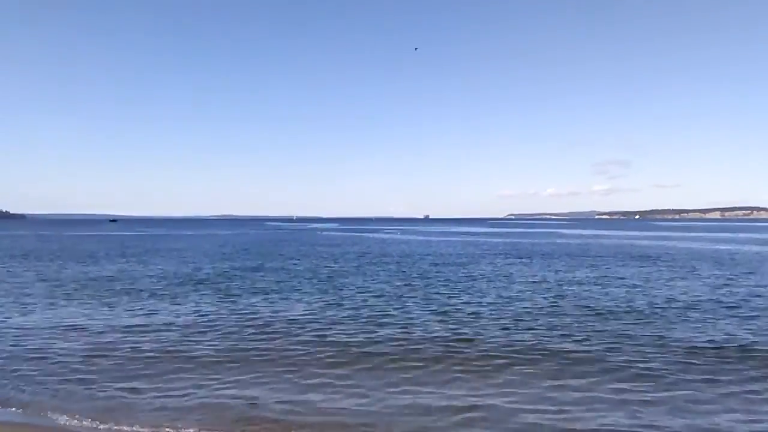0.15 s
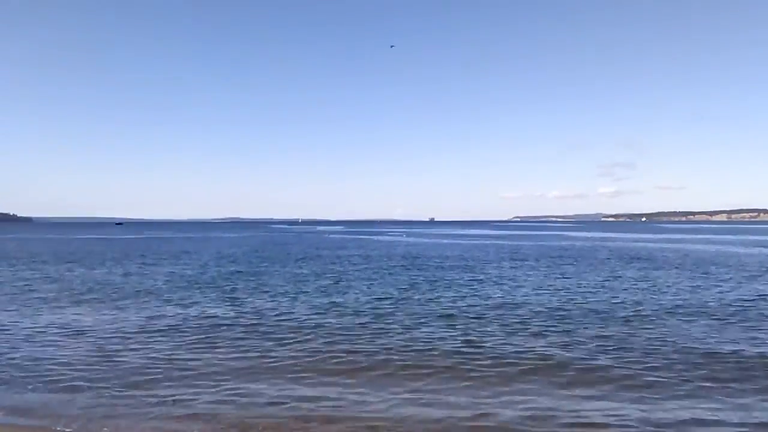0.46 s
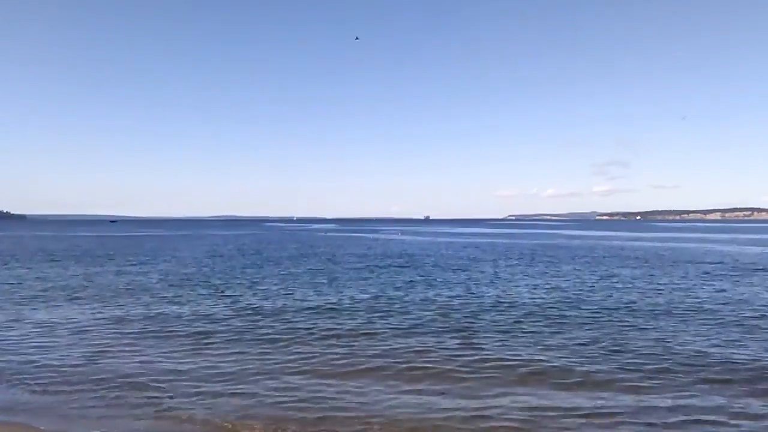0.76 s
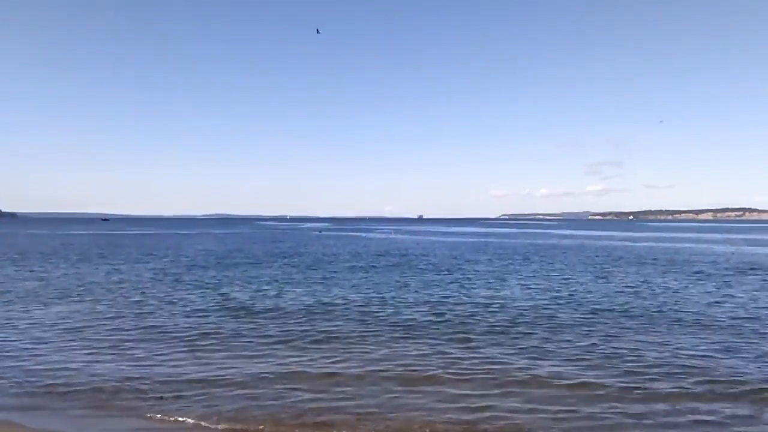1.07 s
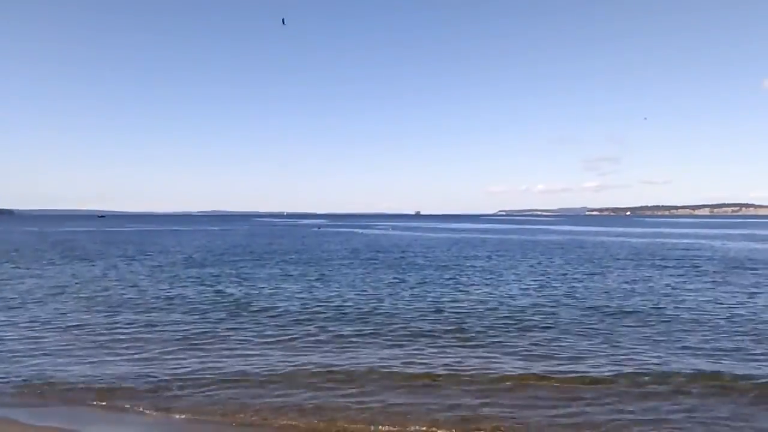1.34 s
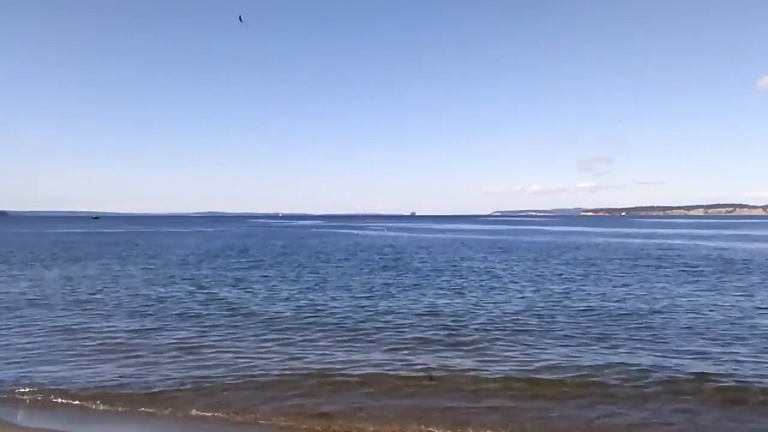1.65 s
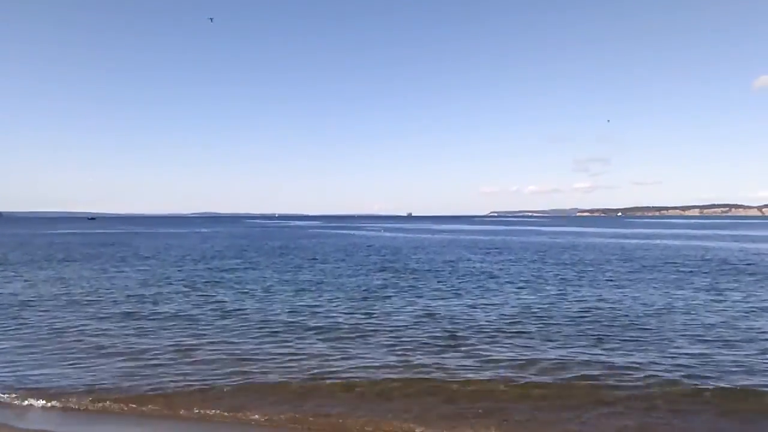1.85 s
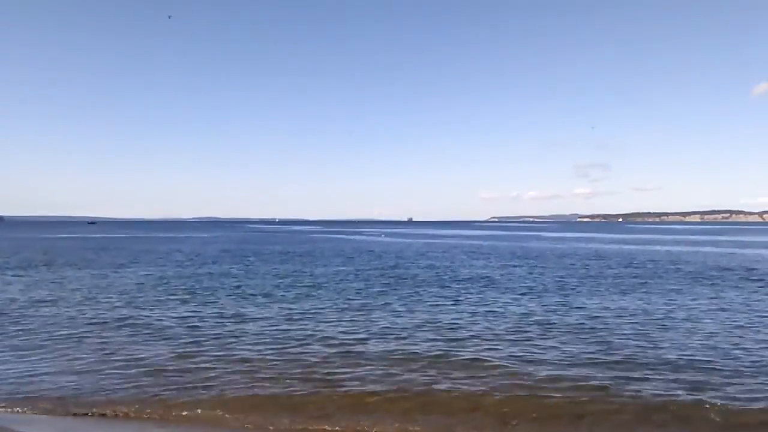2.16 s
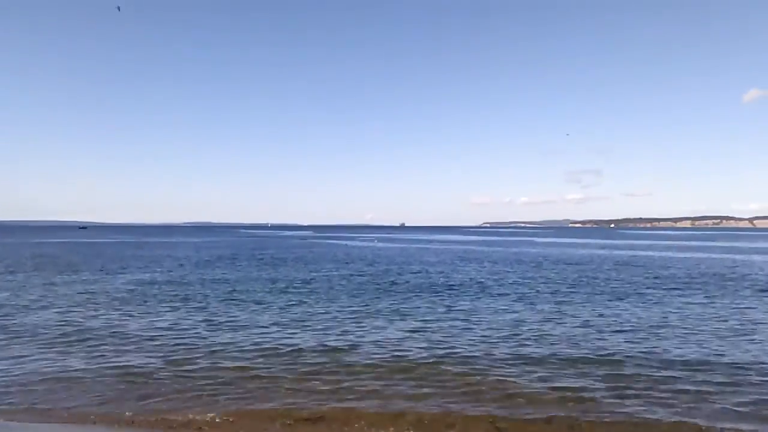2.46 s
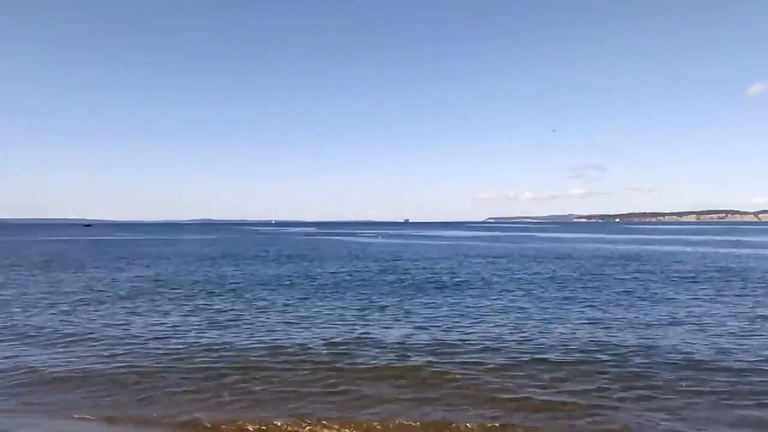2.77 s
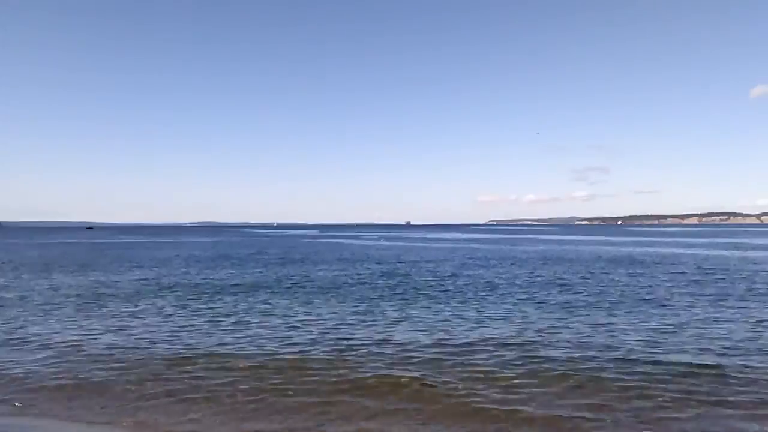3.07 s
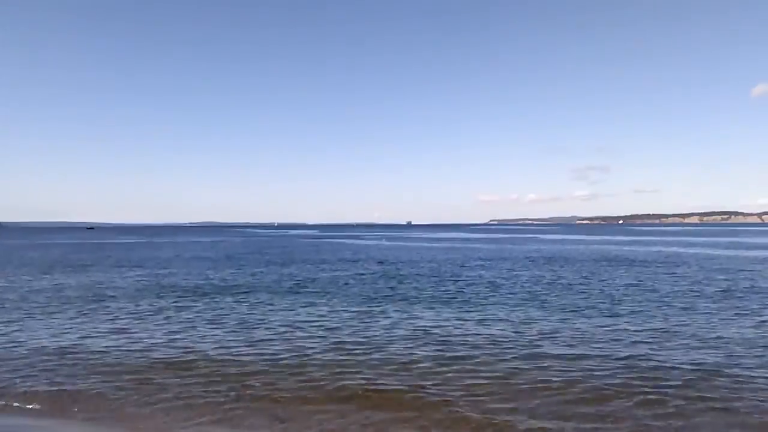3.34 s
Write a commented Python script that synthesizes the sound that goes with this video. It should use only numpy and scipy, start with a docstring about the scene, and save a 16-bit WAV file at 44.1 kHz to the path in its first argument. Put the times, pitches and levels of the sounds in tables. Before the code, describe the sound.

Small waves wash and fizz onto a sandy beach, bubbling, with light wind rumble.

```python
"""Small waves on a sandy beach

Heard from the water's edge in a light breeze: one wavelet washes in farther along the shore; a nearer one
runs up from the left, spits spray and folds over with bubbles. Washes are crackling noise shaped over time
and frequency, bubbles are decaying sines, spray and drops are short clicks and bursts. Washes and bubbles
reach the right microphone port inverted; wind rumbles in both ports and its puffs bump the left one."""
import sys
import numpy as np
from scipy import signal
from scipy.fft import rfft, irfft
from scipy.io import wavfile
from scipy.ndimage import uniform_filter1d

SR = 44100
rng = np.random.default_rng(int(sys.argv[2]) if len(sys.argv) > 2 else 0)


def transcribe(u):
    """Save the signal u as a 16-bit wav file named by the first command-line argument.

    u: samples, shape (n,) or (channels, n), limited to [-1, 1]; the rate is SR.
    q: integer samples, one column per channel.
    """
    v = np.clip(np.atleast_2d(u).T, -1, 1)
    q = np.round(v * 32767).astype(np.int16)
    wavfile.write(sys.argv[1], SR, q)


N = 154791
TIME = np.arange(N) / SR

# nearer wavelet, relative levels: [time_s, churn_db, fizz_db]
NEAR_WAVE = [(1.1, -8.5, -12), (1.3, -9.5, -11.5), (1.41, -3, -4), (1.62, -2, -6.5), (1.85, -7.5, -7.5),
             (2.0, -13, -10), (2.2, -35, -10.5), (2.52, -37, -9.5), (2.64, -7.5, -2), (2.74, -5, 0.5),
             (2.84, -1.5, 3.5), (2.93, 0, 2), (3.0, 2, 0), (3.16, 0, 2), (3.21, -5, -3), (3.31, -8.5, -9),
             (3.48, -10, -17)]
# farther wavelet, relative levels: [time_s, churn_db, fizz_db]
FAR_WAVE = [(0.08, -10, -7), (.16, -0.5, -3), (.3, -1, -3.5), (.5, -1, -0.5), (.7, 2.5, 2), (.9, 0.5, -1),
            (1.02, -2, -5.5), (1.25, -7, -12), (1.8, -19, -27), (2.3, -10.5, -33)]
# spectrum of near water before its level curves: [freq_hz, left_db_per_hz, right_db_per_hz]
NEAR_COLOUR = [(210, -79.5, -81.5), (484, -86, -89), (650, -80.5, -84), (940, -82.5, -83.5),
               (1220, -83.5, -83.5), (1470, -81.5, -82.5), (2400, -82, -87.5), (3700, -82, -84.5),
               (6400, -87, -86.5), (9300, -89, -87), (10700, -80, -89), (11300, -73.5, -90),
               (12800, -84.5, -102), (13320, -83, -95), (14500, -107.5, -103)]
# likeness of near water at the two ports: [freq_hz, likeness_0_to_1]
NEAR_LIKENESS = [(500, 0.95), (1100, 0.85), (2200, 0.12), (5000, 0.074)]
NEAR_LAG_S = 0.00016  # right port after left
BUBBLE_RIGHT_DB = -9  # right port relative to left


def amp(db):
    """Decibels to gain."""
    return 10 ** (np.asarray(db) / 20)


def unit(x):
    """Scales to rms 1."""
    return x / np.sqrt(np.mean(x ** 2) + 1e-20)


def over_hz(table, hz):
    """Reads each column of a table along log frequency."""
    table_hz, *columns = np.transpose(table)
    return np.array([np.interp(np.log(hz + 1), np.log(table_hz + 1), c) for c in columns])


def over_time(table, t):
    """Reads each column of a table along time, holding the end values outside it."""
    table_s, *columns = np.transpose(table)
    return np.array([np.interp(t, table_s, c) for c in columns])


def add(mix, start_s, sound):
    """Mixes a sound in at its start time, cut at the end of the mix."""
    part = mix[..., round(start_s * SR):][..., :sound.shape[-1]]
    part += sound[..., :part.shape[-1]]


def wander(rate_hz):
    """Random drift of rms 1: noise above 3 Hz that rolls off past rate_hz."""
    hz = np.fft.rfftfreq(N, 1 / SR)
    gain = (hz > 3) / (1 + (hz / rate_hz) ** 2)
    return unit(irfft(rfft(rng.standard_normal(N)) * gain, N))


def tint(x, colour):
    """Gives unit white noise a spectrum per port; minimum phase avoids ringing ahead of a click."""
    size = 2 ** 18
    hz = abs(np.fft.fftfreq(size, 1 / SR))
    log_gain = np.log(amp(over_hz(colour, hz)) * np.sqrt(SR / 2))
    response = np.exp(np.conj(signal.hilbert(log_gain)))
    return np.fft.ifft(np.fft.fft(x, size) * response).real[:, :N]


def crackle(per_s, spread_db, share):
    """Two trains of bursting bubbles, mostly tiny, over the noise blur of countless others."""
    size = amp(spread_db * np.minimum(rng.exponential(1, N), 4))
    size = size * (rng.random(N) < per_s / SR)
    share = np.clip(share, 0, 1)  # power share of the bursts
    bursts = unit(size * rng.standard_normal((2, N)))
    blur = rng.standard_normal((2, N))
    return np.sqrt(share) * bursts + np.sqrt(1 - share) * blur


def wash(grains, wave, colour, likeness, lag_s, churn_hz, fizz_hz, patchy_db):
    """Bubble noise swells with the wave, low churn and high fizz apart, and reaches both ports."""
    drain_db_per_s = 80
    hz, t, (a, b) = signal.stft(grains, SR, nperseg=512, noverlap=384)
    same = np.clip(over_hz(likeness, hz).T, 0, 1)
    delay = np.exp(-2j * np.pi * hz * lag_s)[:, None]
    right = -(same * a + np.sqrt(1 - same ** 2) * b) * delay  # inverted
    # fade before the wave arrives and after it drains
    outside_s = abs(t - np.clip(t, wave[0][0], wave[-1][0]))
    churn, fizz = over_time(wave, t) - drain_db_per_s * outside_s
    high = over_hz([(churn_hz, 0), (fizz_hz, 1)], hz).T
    patches = uniform_filter1d(rng.standard_normal((len(t), len(hz))), size=9, axis=0)
    patches = unit(uniform_filter1d(patches, size=7, axis=1)).T
    field = amp(churn + high * (fizz - churn) + patchy_db * patches)
    ports = signal.istft(np.array([a, right]) * field, nperseg=512, noverlap=384)[1]
    return tint(ports[:, :N], colour)


def near_wave():
    """A grainy wash close by, its level sloshing quickly at random."""
    slosh = amp(0.9 * wander(rate_hz=40))
    grains = crackle(per_s=2000, spread_db=2.0, share=0.27) * slosh
    return amp(-1.9) * wash(grains, NEAR_WAVE, NEAR_COLOUR, NEAR_LIKENESS, NEAR_LAG_S,
                            churn_hz=1540, fizz_hz=6340, patchy_db=2.3)


def lip():
    """Thin crackling lip running over the sand at the left, so compact that the ports hear it much alike."""
    # relative levels: [time_s, churn_db, fizz_db]
    lip_wave = [(1.3, -15, -15.5), (1.85, -11.5, -15), (2.1, -10.5, -18.5), (2.22, -12, -6),
                (2.33, -11.5, -10.5), (2.44, -8.5, -7), (2.54, -12.5, -9.5), (2.8, -4, -23)]
    # likeness of the ports: [freq_hz, likeness_0_to_1]
    lip_likeness = [(6000, 1), (9000, 0.79), (13000, 0.22)]
    grains = crackle(per_s=1200, spread_db=2, share=0.42)
    return wash(grains, lip_wave, NEAR_COLOUR, lip_likeness, lag_s=0.000336,
                churn_hz=1560, fizz_hz=6300, patchy_db=2.8)


def far_wave():
    """A smooth wash farther along the beach, reaching the right port first."""
    # spectrum before the level curves: [freq_hz, left_db_per_hz, right_db_per_hz]
    far_colour = [(197, -82, -84.5), (524, -83, -87), (880, -84.5, -92.5), (1360, -82.5, -86),
                  (2015, -84.5, -91.5), (2710, -100.5, -89.5), (3540, -88, -91), (5600, -97, -97),
                  (7000, -88.5, -100.8), (10000, -94.5, -88.5), (10000, -83, -98), (11240, -80, -102),
                  (12100, -94, -103.0), (13200, -100.0, -109.9)]
    # likeness of the ports: [freq_hz, likeness_0_to_1]
    far_likeness = [(500, 0.97), (2500, 1), (6000, 0.43)]
    grains = crackle(per_s=2000, spread_db=3.0, share=0.15)
    return wash(grains, FAR_WAVE, far_colour, far_likeness, lag_s=-0.0003,
                churn_hz=1790, fizz_hz=7200, patchy_db=1.5)


def bubble(pitch_hz, left_peak_db):
    """A bubble pinches off sharply and rings for a few cycles, rising slightly in pitch."""
    decay_cycles, rise = 2.6, 0.01  # rise: share of pitch per decay time
    lag_s = np.array([[0], [NEAR_LAG_S]])
    age_s = np.maximum(np.arange(round(0.04 * SR)) / SR - lag_s, 0)
    age = age_s * pitch_hz / decay_cycles  # in decay times
    tone = np.sin(2 * np.pi * decay_cycles * age * (1 + rise * age / 2))
    ring = tone * np.exp(-age) * (1 - np.exp(-20 * age))
    return amp(left_peak_db) * ring / ring.max() * np.array([[1], [-amp(BUBBLE_RIGHT_DB)]])


def gurgle(wave, per_s, base_db, low_hz, high_hz):
    """Many small bubbles of random pitch and loudness gurgle throughout, following the wave's churn
    and holding its end levels outside it."""
    spread_db = 12
    out = np.zeros((2, N))
    for when, pitch, loudness in rng.random((round(per_s * N / SR), 3)):
        start_s = when * N / SR
        pitch_hz = low_hz * (high_hz / low_hz) ** pitch
        churn_db = over_time(wave, start_s)[0]
        add(out, start_s, bubble(pitch_hz, base_db + spread_db * loudness ** 2 + churn_db))
    return out


def bubbles():
    """Both wavelets gurgle, the farther one more dully; single louder bubbles pop among them."""
    # louder bubbles: [start_s, pitch_hz, left_peak_db]
    loud_bubbles = [(0.294, 1400, -40), (0.652, 1550, -36), (1.2535, 2380, -37.5), (1.3965, 2470, -38.5),
                    (1.419, 2350, -39), (1.612, 1650, -38), (1.6995, 3100, -39), (2.748, 750, -33.5),
                    (2.762, 660, -37.5), (2.798, 975, -38), (2.828, 970, -34), (2.831, 1550, -32),
                    (2.853, 1830, -36), (2.879, 1000, -36), (2.9108, 4000, -31), (2.918, 1900, -31),
                    (2.979, 1650, -35), (3.1225, 1660, -31), (3.1248, 2160, -31), (3.162, 674, -41)]
    out = gurgle(NEAR_WAVE, per_s=170, base_db=-52, low_hz=850, high_hz=5000)
    out += gurgle(FAR_WAVE, per_s=130, base_db=-54.5, low_hz=800, high_hz=2100)
    for start_s, pitch_hz, left_peak_db in loud_bubbles:
        add(out, start_s, bubble(pitch_hz, left_peak_db))
    return out


def clouds():
    """A cloud of trapped air hums noisily around one pitch, swelling and dying away."""
    # bubbles ringing together, level before the swell: [start_s, length_s, pitch_hz, left_rms_db]
    cloud_table = [(0.153, 0.076, 1130, -53.5), (2.191, 0.057, 756, -51), (2.853, 0.097, 3440, -49),
                   (2.897, .15, 171, -54), (2.978, 0.18, 1900, -52.5), (3.003, 0.23, 490, -60.5),
                   (3.117, 0.042, 3030, -47.5)]
    width = 0.45  # share of pitch, each side, at -12 dB
    out = np.zeros((2, N))
    hz = np.fft.rfftfreq(N, 1 / SR)
    delay = np.exp(-2j * np.pi * hz * NEAR_LAG_S)
    for start_s, length_s, pitch_hz, left_rms_db in cloud_table:
        resonance = 1 / (1 + ((hz - pitch_hz) / (width * pitch_hz)) ** 2) ** 2
        ring = rfft(rng.standard_normal(N)) * resonance
        left = unit(irfft(ring, N))
        right = unit(irfft(-ring * delay, N))
        phase = np.clip((TIME - start_s) / length_s, 0, 1)
        swell = np.sqrt(np.maximum(np.sin(np.pi * phase), 0))
        out += amp(left_rms_db) * swell * np.array([left, amp(BUBBLE_RIGHT_DB) * right])
    return out


def spray():
    """Short spits of spray: crackle in bursts that peak after a third of their length, then decay."""
    # spits, relative level: [start_s, level_db, length_s]
    spit_table = [(2.192, -6, 0.015), (2.308, -7.5, 0.016), (2.322, -7.5, 0.012), (2.416, -6.5, 0.016),
                  (2.825, -7, .016), (3.126, -3, 0.026), (3.165, -12, 0.0077)]
    spits = np.zeros(N)
    for start_s, level_db, length_s in spit_table:
        age = np.maximum(TIME - start_s, 0) / (length_s / 3)
        spits += amp(level_db + 4) * age * np.exp(1 - age)  # all spits 4 dB up
    grains = crackle(per_s=2100, spread_db=3.5, share=0.45)
    low_cut = signal.butter(1, 2200, "high", fs=SR, output="sos")
    return signal.sosfilt(low_cut, tint(spits * grains, NEAR_COLOUR))


def drops():
    """Single drops tick close to the microphone: coloured impulses, quieter at the right port."""
    # close drops: [start_s, left_peak_db]
    drop_table = [(1.5648, -31), (1.602, -34), (2.1993, -22.5), (2.3242, -26), (2.3792, -24.5),
                  (3.1615, -23)]
    # tick spectrum before peak scaling: [freq_hz, left_db_per_hz, right_db_per_hz]
    tick_colour = [(1500, -14, -16), (4500, -2, -4), (9000, 4, 0), (11200, 19, 4), (14000, 7, 4)]
    right_db = -9
    tick = tint(signal.unit_impulse(N), tick_colour)[:, :256]
    tick = tick / abs(tick).max(axis=1, keepdims=True) * amp([[0], [right_db]])
    out = np.zeros((2, N))
    for start_s, left_peak_db in drop_table:
        add(out, start_s, amp(left_peak_db) * tick)
    return out


def calm():
    """Steady trickle of the rest of the shoreline."""
    # spectrum: [freq_hz, left_db_per_hz, right_db_per_hz]
    calm_colour = [(150, -101, -103), (780, -97, -102), (1450, -93.5, -98), (2900, -101, -101),
                   (6000, -103, -104), (9000, -101, -103), (11200, -95.5, -106), (13100, -104, -111)]
    steady = [(0, 0, 0), (N / SR, 0, 0)]
    grains = crackle(per_s=900, spread_db=2.5, share=0.2)
    return wash(grains, steady, calm_colour, NEAR_LIKENESS, NEAR_LAG_S,
                churn_hz=1600, fizz_hz=6000, patchy_db=1.5)


def wind():
    """Lumpy rumble, unrelated at the ports, and puffs at the left: pressure steps thump in the bass cut."""
    # rumble before breeze and bass cut: [freq_hz, left_db_per_hz, right_db_per_hz]
    rumble_colour = [(50, -75.5, -80), (95, -86, -90), (190, -101, -106), (1500, -155, -155)]
    # breeze, relative level: [time_s, level_db]
    breeze = [(0, -1), (.25, 2), (1.05, 0), (1.35, -7), (1.72, -2), (1.9, 5), (2.3, 6), (2.55, 0), (3.0, 1)]
    # puffs on the left port: [start_s, peak_db, rise_s]
    puffs = [(0.244, -43, 0.0086), (0.422, -46.5, 0.0048), (0.479, -44.5, 0.004), (0.7102, -38, 0.0015),
             (1.7612, -40.5, 0.0026), (1.843, -38.5, 0.0054), (1.864, -55, .008), (1.923, -42.5, 0.0059),
             (1.989, -48, 0.0079), (2.066, -44, 0.0073), (2.112, -47, 0.01), (2.1755, -38.5, 0.0044),
             (2.238, -38.5, 0.0045), (2.3256, -27.5, 0.00034), (2.3584, -37, 0.0035), (2.967, -40, 0.0044),
             (3.419, -47.5, 0.0105)]
    bass_cut = signal.butter(4, 56, "high", fs=SR, output="sos")  # microphone
    gust_db = 2.4 * wander(rate_hz=9.3)
    rumble = tint(rng.standard_normal((2, N)), rumble_colour)
    out = signal.sosfilt(bass_cut, rumble * amp(over_time(breeze, TIME) + gust_db))
    for start_s, peak_db, rise_s in puffs:
        step = np.sin(np.pi / 2 * np.minimum(TIME / rise_s, 1)) ** 2
        thump = signal.sosfilt(bass_cut, step)
        add(out[0], start_s, amp(peak_db) * thump / abs(thump).max())
    return out


def scene():
    """Water and wind together; the microphone thins the water's bass."""
    water = near_wave() + lip() + far_wave() + bubbles() + clouds() + spray() + drops() + calm()
    bass_cut = signal.butter(2, 85, "high", fs=SR, output="sos")
    return signal.sosfilt(bass_cut, water) + wind()


def record(dry):
    """The recorder's band limit: a steep linear-phase low-pass."""
    edge_hz = 14400
    low_pass = signal.firwin(511, edge_hz, window=("kaiser", 7), fs=SR)
    return signal.oaconvolve(dry, low_pass[None], "same")


dry = scene()
out = record(dry)
transcribe(out)
```